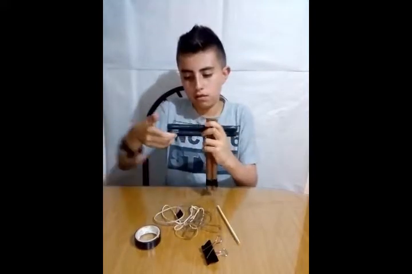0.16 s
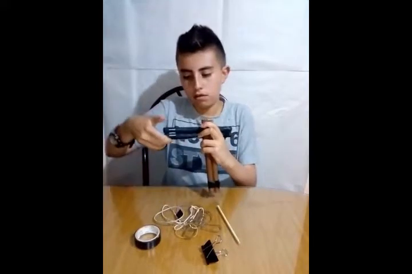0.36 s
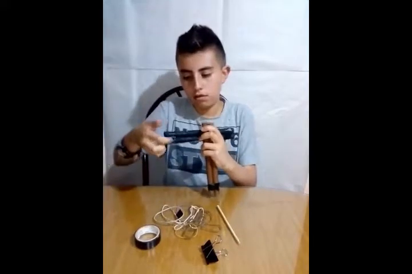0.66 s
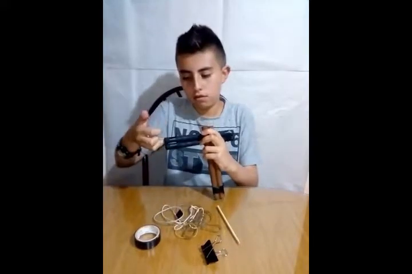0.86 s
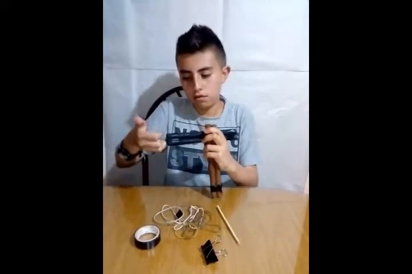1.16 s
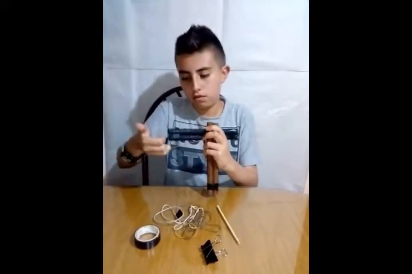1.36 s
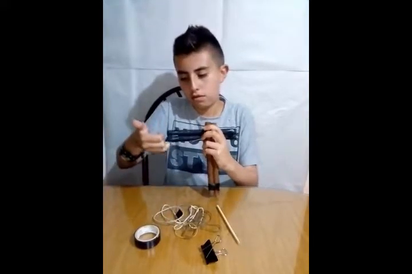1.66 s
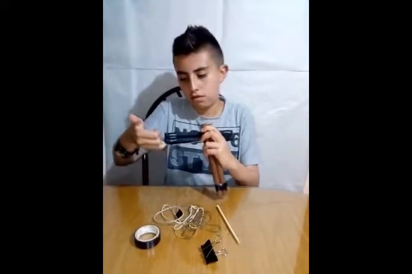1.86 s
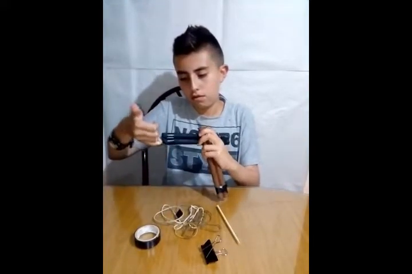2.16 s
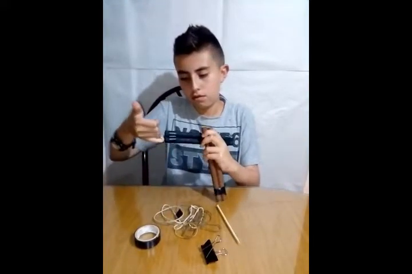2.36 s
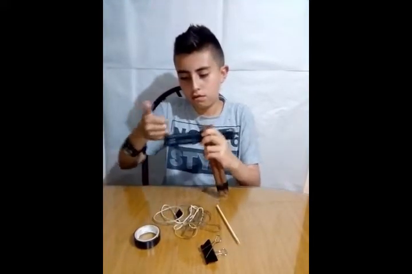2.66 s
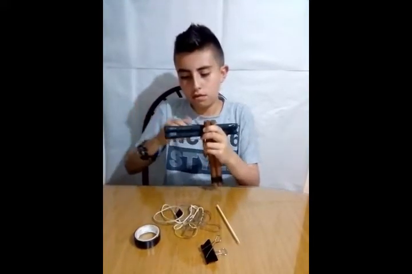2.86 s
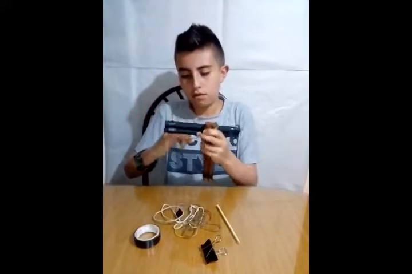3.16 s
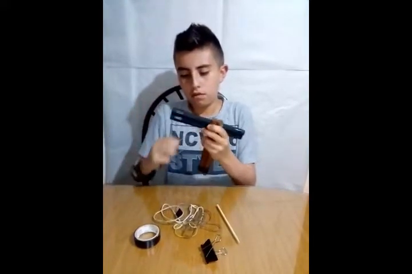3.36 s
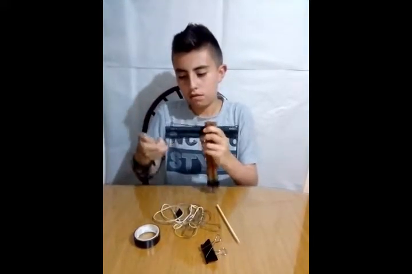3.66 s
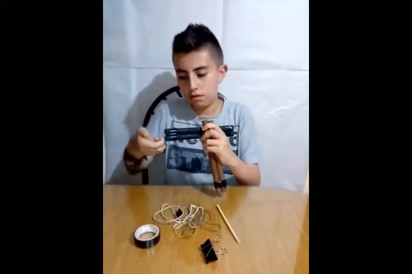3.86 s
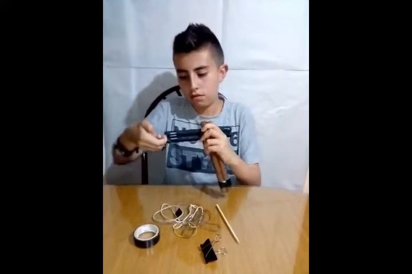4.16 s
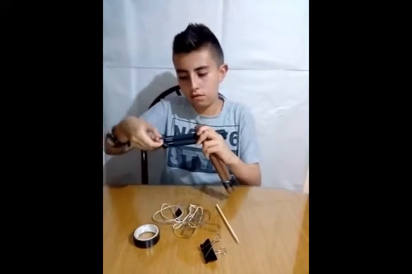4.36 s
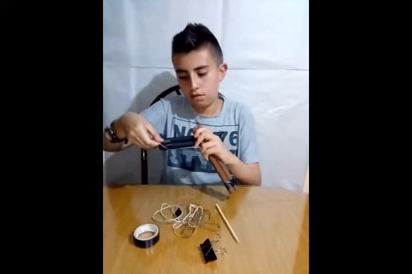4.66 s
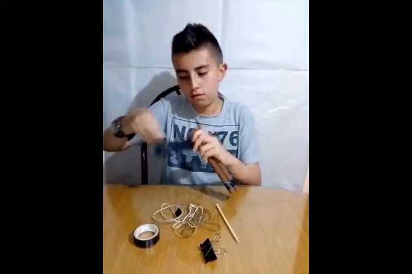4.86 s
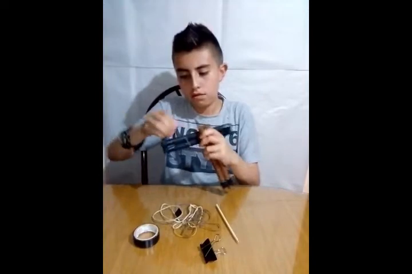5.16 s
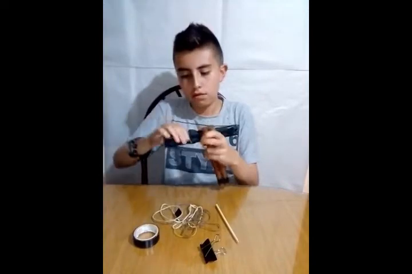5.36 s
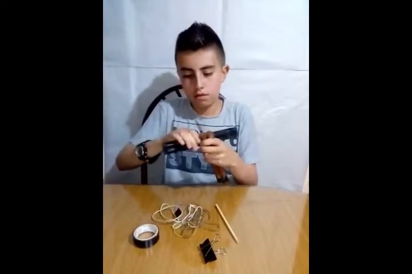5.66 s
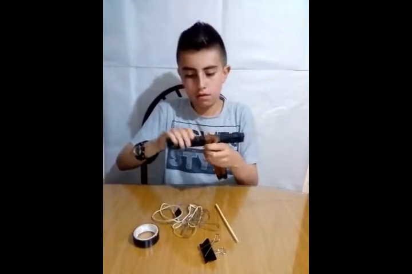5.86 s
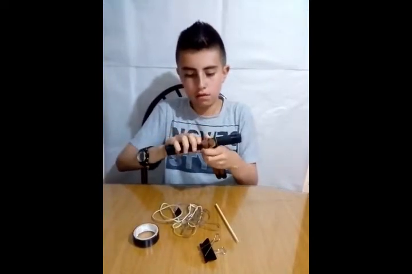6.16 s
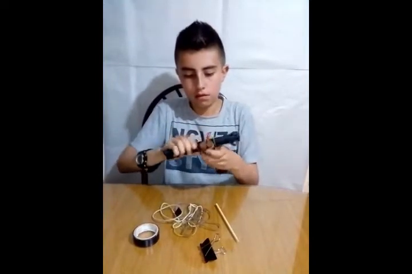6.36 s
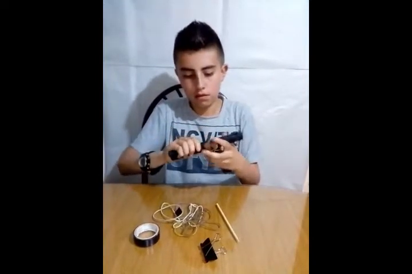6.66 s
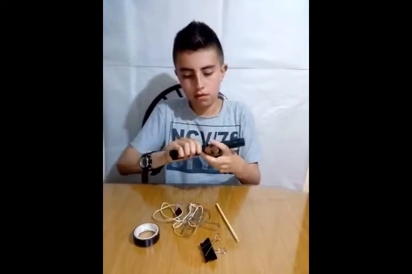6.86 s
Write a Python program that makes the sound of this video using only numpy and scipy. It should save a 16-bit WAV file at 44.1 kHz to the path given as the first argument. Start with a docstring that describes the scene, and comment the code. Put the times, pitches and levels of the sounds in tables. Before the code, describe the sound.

A quiet small room with soft low hum and faint hiss, heard by a phone about a metre from a table. Hands work rubber bands round small wooden sticks. Tiny ticks begin at 0.05 and 0.14 seconds; a brisk cluster of dry clicks comes around 0.55-0.6, pairs near 0.8, and lighter ticks until 1.75. A barely audible thin falling tone swells twice around 1.5-1.75. A hard cluster at 2.42-2.46 snaps brightly and ends in a hollow woody knock, with soft low table thuds. Sparse clicks follow around 2.8, 3.1 and 3.5, then a sharp snap at 3.94. From 4.83 to 4.94 a rapid crackling flurry peaks at 4.92, the loudest and brightest. A dull table bump swells at 5.5 with small clicks; faint scattered ticks continue from 6 to 6.85. Short room reflections follow each snap.

```python
"""At a table in a small room, a phone a metre away: hands wind rubber bands round small wooden sticks.
Slips, snaps and knocks are rough noise contacts that ring five groups of short decaying modes.
Hard echoes and a diffuse noise tail answer each click; dull thuds are noise pushes through table modes.
Behind them a faint gliding sine swells twice, over shaped noise for the house hum and phone hiss."""
import sys
import numpy as np
from scipy import signal
from scipy.fft import rfft, irfft
from scipy.io import wavfile
from scipy.ndimage import uniform_filter1d

SR = 44100
rng = np.random.default_rng(int(sys.argv[2]) if len(sys.argv) > 2 else 0)


def bounce(signal):
    """Save signal as a 16-bit WAV file at the path given by the first command-line argument."""
    frames = np.transpose(np.atleast_2d(signal))
    limited = np.clip(frames, -1, 1)
    pcm = np.round(limited * 32767).astype(np.int16)
    wavfile.write(sys.argv[1], SR, pcm)


N = 308681  # length in samples, about 7 s

# slips and knocks of the bundle; the grip leaves one stick pitch free; levels are nominal peaks:
# start_s, bite_db, edge_db, stick_db, body_db, free_pitch_hz, share_to_room_db
CLICKS = [(0.0526, -51, -60, -58, -61, 3090, -9), (0.1383, -38.5, -44, -47.5, -56, 2720, -5.5),
          (0.5477, -29, -34, -39, -64, 2770, -10.5), (0.553, -45, -39, -50, -65, 2700, -10),
          (0.5691, -31, -35, -52, -46.5, 2800, -2.5), (0.5721, -23, -42, -33.5, -38, 2740, -9),
          (0.577, -33, -35, -59, -42, 2810, -6.5), (0.5912, -37, -48, -46, -56, 2420, -16),
          (0.5952, -28, -55, -57, -62, 3030, -7), (0.7955, -32, -47, -45.5, -53, 2660, -8),
          (0.826, -29, -34, -44, -47.5, 3220, -10.5), (0.8334, -46, -42, -46, -63, 2330, -3),
          (1.059, -42.5, -65, -54, -57, 2960, -5), (1.0765, -37, -50, -35.5, -66, 2740, -7),
          (1.0808, -43, -60, -38.5, -52, 2700, -3.5), (1.102, -41, -54, -50, -61, 2670, -9),
          (1.1706, -46, -62, -59, -70, 2640, -11), (1.3352, -49, -54, -49, -54, 2980, -3),
          (1.3451, -32.5, -53, -43, -60, 2830, -8), (1.3484, -30.5, -38.5, -49, -54, 2590, -4.5),
          (1.4526, -37, -41, -53, -52, 2320, -9), (1.4888, -39, -45, -51, -58, 2900, -10),
          (1.5812, -44, -44, -55, -67, 2660, -8), (1.7338, -44.5, -47, -51.5, -70, 2600, -1.5),
          (2.0262, -54, -65, -50, -58, 1720, -8), (2.271, -59, -70, -51, -42.5, 1980, -16),
          (2.4152, -23, -31, -28.5, -63, 3100, -4), (2.4197, -15.5, -29, -36, -42, 2570, -5),
          (2.4226, -15, -40, -40, -38, 2840, -7), (2.4292, -18, -23, -31, -41, 2500, -8.5),
          (2.451, -26.5, -17.5, -13, -15, 1850, -7), (2.4577, -41, -43, -31, -27.5, 1850, -5),
          (2.6969, -58, -70, -56, -39, 2420, -10.5), (2.7679, -35, -36.5, -52, -70, 2600, -3),
          (3.0902, -59, -59, -52, -61, 2070, 1), (3.1314, -34.5, -40, -40, -44, 3440, -5),
          (3.1423, -39, -35, -39.5, -41.5, 2320, -8.5), (3.4397, -46.5, -66, -43.5, -59, 2160, -8),
          (3.5424, -36, -42, -32, -63, 2400, -8.5), (3.572, -45, -42, -44, -54, 1810, -6),
          (3.893, -34.5, -34, -38.5, -52, 2920, -5.5), (3.939, -17.5, -28, -42, -49, 2150, -10.5),
          (3.9469, -50, -31, -40.5, -54, 2670, -5), (4.2063, -53, -53, -58, -70, 2830, -10),
          (4.735, -62, -68, -46, -59, 2280, -13), (4.8347, -16, -43, -40, -52, 3290, -10),
          (4.842, -34, -33, -35.5, -56.5, 3310, -1), (4.8523, -19.5, -42.5, -51.5, -58, 3250, -7),
          (4.868, -27, -43, -38.5, -64.5, 2360, -1), (4.8787, -22, -27.5, -30.5, -53, 3240, -5),
          (4.891, -21, -30, -25, -58, 3420, -9), (4.8979, -40, -23, -48, -41, 3290, -3),
          (4.906, -26, -25, -49, -48, 3246, -9), (4.9199, -8.5, -15, -17.5, -42.5, 3400, -9),
          (4.9277, -27, -36, -24, -33, 1970, -11), (4.9374, -18.5, -22.5, -44, -52, 3430, 2.5),
          (5.2255, -53.5, -57, -60, -62, 2740, 2.5), (5.3268, -48, -49, -56, -61, 2960, -2.5),
          (5.338, -40, -48, -39.5, -47, 2540, -11), (5.5287, -38, -50, -37, -61, 2530, -10),
          (5.5368, -30.5, -36, -41, -58, 2600, -6.5), (5.5436, -37, -28.5, -37, -63, 2650, -8),
          (5.551, -32.5, -31, -57, -68, 2560, -4), (5.5618, -43, -43, -37, -61, 2710, -12),
          (5.9611, -57, -64, -60, -61, 2680, 1.5), (6.0976, -52, -58, -60, -69, 2400, 2.5),
          (6.122, -39, -53, -36, -62, 2960, -11), (6.318, -60, -64, -53, -70, 2730, -14),
          (6.338, -48, -57, -56, -67, 3290, -12), (6.3592, -47.5, -63, -44, -70, 2830, -11),
          (6.3943, -48.5, -54, -64, -61, 1970, -1.5), (6.4113, -52, -56, -60, -64, 2010, -4),
          (6.509, -51.5, -60, -68, -71, 1740, -3), (6.7867, -56, -62, -61, -49.5, 2700, -14),
          (6.8175, -51.5, -52, -63, -60, 2680, 1), (6.84, -46, -51, -59, -63, 2390, -3)]
# resonances of the bundle in five groups, each: pitch_hz, relative_level_db, t60_s
BITE = [(5694, -11.5, 0.0073), (6680, 1.5, 0.0043), (7720, 2, 0.0011)]
BODY = [(337, 1, 0.0085), (526, -7.5, 0.026), (715, 8, 0.012), (911, 11.5, 0.0045), (1176, 3.5, 0.015),
        (1540, 6.5, 0.0033)]
STICK = [(1926, -1, 0.0056), (2230, -1.4, 0.0039), (2538, 0.44, 0.0082), (2772, -0.47, 0.0049),
         (3350, -0.44, 0.0064)]
EDGE = [(4240, 2, 0.0019), (4370, -7, 0.013), (4840, -4, 0.0047)]
AIR = [(9050, -3.5, 0.0055), (10550, 4.5, 0.0021), (12200, -3, 0.0013), (14000, -7, 0.0089)]
# thuds through the table: start_s, level_db, deep_modes_relative_db, rise_s, t60_s
THUDS = [(0.85, -54.5, -6, 0.013, 0.13), (2.265, -48.5, 8, 0.015, 0.28), (2.44, -49, 11.5, 0.022, 0.47),
         (2.69, -50, 5, 0.012, 0.1), (2.74, -52, 9, 0.017, 0.75), (3.825, -51.5, 1, 0.04, 0.38),
         (3.91, -52.5, -8, 0.014, 0.8), (4.82, -48, -9, 0.027, 0.69), (4.87, -47.5, -9, 0.019, 0.15),
         (4.97, -53.5, 11, 0.034, 0.57), (5.464, -39, 6.5, 0.039, 1), (5.8, -56, -2, 0.088, 0.9)]
# modes of the table top: pitch_hz, width_hz, relative_level_db
TABLE_MODES = [(60.5, 21.4, 6.5), (96.8, 8.4, 10), (161, 30, 18.5), (225, 59, 26.5), (241, 22, -29),
               (302, 25, 11), (401, 37, -20.5), (545, 240, -17), (845, 180, -13)]
# swells of the faint far tone: start_s, length_s, level_db
WHINE_SWELLS = [(1.49, 0.19, -70), (1.665, 0.11, -70.5)]
# early echoes off table, chest and near walls: delay_s, level_db
ECHOES = [(0.0067, -8), (0.0028, -4), (0.012, -10.5)]
# decay of the small room: pitch_hz, t60_s
ROOM_T60 = [(500, 0.28), (2000, 0.27), (6000, 0.27), (12000, 0.048)]
# spectrum of house and phone noise: pitch_hz, relative_level_db_per_hz
HOUSE_SPECTRUM = [(12, -45), (30, -20), (55, -5.5), (110, -4), (230, -6), (400, -12), (775, -17),
                  (1280, -20), (5600, -26.5), (7000, -27.5), (8000, -39), (12000, -39.5), (13900, -46.5),
                  (14500, -31), (15500, -30)]

# at a bite of AIR_AT_DB the air modes lie at AIR_DB below it; harder snaps are brighter
AIR_DB, AIR_PER_DB, AIR_AT_DB = -13, 0.15, -34.5
# time scale of a contact whose louder of bite and stick is -41 dB; harder ones are shorter
CONTACT_MS, SHORTER_PER_DB = 1.07, 0.013
# muting by the fingers at a stick level of -37.5 dB; hard knocks shake it loose
GRIP_DB_PER_OCTAVE, LOOSER_PER_DB = 62.0, 1.7
ROOM_DB, ROOM_RISE_S = 0, 0.0032
DEEP_HZ, UPPER_HZ = 130, 380  # borders between deep, top and upper table modes
UPPER_DB, UPPER_FADE = 8.5, 2  # the upper table modes are pushed harder and die faster
WHINE_HZ, SAG_HZ_PER_S = 740, 212  # pitch at the first swell, and its fall
HOUSE_DB = -58.5  # rms
TOP_HZ = 16600  # top of the phone's range


def undb(db):
    """Decibels to gain."""
    return 10 ** (np.asarray(db) / 20)


def unit(x):
    """Scale to rms 1."""
    return x / np.sqrt(np.mean(x ** 2))


def band(x, hz, width_hz):
    """Second-order band-pass."""
    return signal.lfilter(*signal.iirpeak(hz, hz / width_hz, fs=SR), x)


def ring(modes, chance, t, free_hz, grip_db, detune=0.029, scatter_db=3.5):
    """One blow on a group of decaying modes; fingers mute stick modes far from the free pitch."""
    hz, db, t60 = np.transpose(modes)[:, :, None]
    pitch_chance, level_chance = chance[:, :len(modes), None]
    if modes is STICK:
        db = db - grip_db * np.abs(np.log2(hz / free_hz))
    # neighbours alternate in sign, so the gaps between them stay filled
    sign = (-1) ** np.arange(len(modes))[:, None]
    level = sign * undb(db + scatter_db * level_chance)
    tone = np.sin(2 * np.pi * hz * (1 + detune * pitch_chance) * t)
    fade = np.exp(-np.log(1000) * t / t60)
    return (level * tone * fade).sum(0)


def sticks():
    """A short rough contact rings the bundle: as aimed at the phone, and as spread all round."""
    out, t = np.zeros((2, N + SR)), np.arange(2048) / SR
    for s, bite_db, edge_db, stick_db, body_db, free_hz, room_db in CLICKS:
        chances = rng.standard_normal((5, 2, 6))
        grits = rng.standard_normal((5, 512))
        grip_db = max(GRIP_DB_PER_OCTAVE - LOOSER_PER_DB * (stick_db + 37.5), 0)
        air_db = bite_db + AIR_DB + AIR_PER_DB * (bite_db - AIR_AT_DB)
        contact_ms = CONTACT_MS * np.exp(-SHORTER_PER_DB * (max(bite_db, stick_db) + 41))
        u = t[:512] * 1000 / max(contact_ms, 0.05)
        press = u * np.exp(-u * 2)
        i = int(s * SR)
        groups = (BITE, BODY, STICK, EDGE, AIR)
        levels_db = (bite_db, body_db, stick_db, edge_db, air_db)
        for modes, db, chance, grit in zip(groups, levels_db, chances, grits):
            # a small object radiates little below its own modes
            cut = signal.butter(2, 0.5 * modes[0][0], "high", fs=SR, output="sos")
            spread = signal.sosfilt(cut, ring(modes, chance, t, free_hz, grip_db))
            aimed = signal.fftconvolve(spread, grit * press)[:2048]
            # rms that would bring the smooth ring to its nominal peak
            size = undb(db) * np.sqrt(np.mean(spread ** 2)) / np.abs(spread).max()
            # summed over all directions the ripples of the rough contact even out
            out[:, i:i + 2048] += size * unit(aimed), size * undb(room_db) * unit(spread)
    return out[:, :N]


def room(aimed, spread):
    """A few hard echoes and a diffuse tail that loses its high treble first."""
    t = np.arange(SR // 2) / SR
    hz, t60 = np.transpose(ROOM_T60)
    tail = 0
    for f in 250 * 2 ** np.arange(0, 6.1, 0.5):  # half-octave bands
        fade = np.exp(-np.log(1000) * t / np.interp(np.log(f), np.log(hz), t60))
        tail = tail + band(rng.standard_normal(len(t)), f, f / 3) * fade
    tail = tail * (1 - np.exp(-t / ROOM_RISE_S))
    response = undb(ROOM_DB) * tail / np.sqrt(np.sum(tail ** 2))
    for s, db in ECHOES:
        # rough surfaces smear each echo over a millisecond or two
        smear = rng.standard_normal(128) * np.exp(-np.arange(128) / 9.5)
        i = int(s * SR)
        response[i:i + 128] += undb(db) * smear / np.sqrt(np.sum(smear ** 2))
    return aimed + signal.fftconvolve(spread, response)[:N]


def table():
    """Uneven noise pushes shake the modes of the table top, each range with its own strength."""
    unevenness = np.repeat(rng.standard_normal(N // 400 + 1), 400)[:N]
    push = rng.standard_normal(N) * undb(2.0 * unevenness)
    deep, top, upper = 0, 0, 0
    for hz, width_hz, db in TABLE_MODES:
        mode = undb(db) * unit(band(band(push, hz, width_hz), hz, 3 * width_hz))
        if hz < DEEP_HZ:
            deep = deep + mode
        elif hz < UPPER_HZ:
            top = top + mode
        else:
            upper = upper + mode
    t = np.arange(N) / SR
    deep_power, top_power, upper_power = 0, 0, 0
    for s, db, deep_db, rise_s, t60 in THUDS:
        # a push builds up over the rise, then dies away
        rise = np.clip((t - s) / max(rise_s, 0.002), 0, 1)
        fade = np.exp(-np.log(1000) * np.maximum(t - s - rise_s, 0) / max(t60, 0.02))
        shape = rise * fade
        deep_power = deep_power + (undb(db + deep_db) * shape) ** 2
        top_power = top_power + (undb(db) * shape) ** 2
        upper_power = upper_power + (undb(db + UPPER_DB) * shape ** UPPER_FADE) ** 2
    thuds = top * np.sqrt(top_power) + upper * np.sqrt(upper_power) + deep * np.sqrt(deep_power)
    return thuds / np.std(top)


def whine():
    """A thin far tone: a sine that sinks steadily in pitch and swells twice."""
    t = np.arange(N) / SR
    swell = 0
    for s, length_s, db in WHINE_SWELLS:
        arch = np.sin(np.pi * np.clip((t - s) / length_s, 0, 1)).clip(0)
        swell = swell + undb(db) * np.sqrt(arch)
    since = t - WHINE_SWELLS[0][0]
    cycles = WHINE_HZ * since - SAG_HZ_PER_S * since ** 2 / 2
    return np.sqrt(2) * np.sin(2 * np.pi * cycles) * swell


def house():
    """Hum and hiss as noise shaped in frequency; the bass swells and sinks a little."""
    hz, db = np.transpose(HOUSE_SPECTRUM)
    f = np.maximum(np.arange(N // 2 + 1) * SR / N, 1.0)
    shape = undb(np.interp(np.log(f), np.log(hz), db, right=-90))
    noise = irfft(rfft(rng.standard_normal(N)) * shape, N)
    low = signal.sosfilt(signal.butter(2, 400.0, fs=SR, output="sos"), noise)
    steps = np.repeat(rng.standard_normal(N // 8000 + 1), 8000)[:N]
    swell_db = 1.5 * unit(uniform_filter1d(steps, size=8000))
    return undb(HOUSE_DB) * unit(noise + low * (undb(swell_db) - 1))


def scene():
    """Clicks in the room over table thuds, the far tone and the house."""
    return (room(*sticks()) + table() + whine() + house())[None]


def record(dry):
    """The phone cuts the top with a steep low-pass."""
    return signal.sosfilt(signal.ellip(10, 0.2, 70, TOP_HZ, fs=SR, output="sos"), dry)


dry = scene()
out = record(dry)
bounce(out)
```